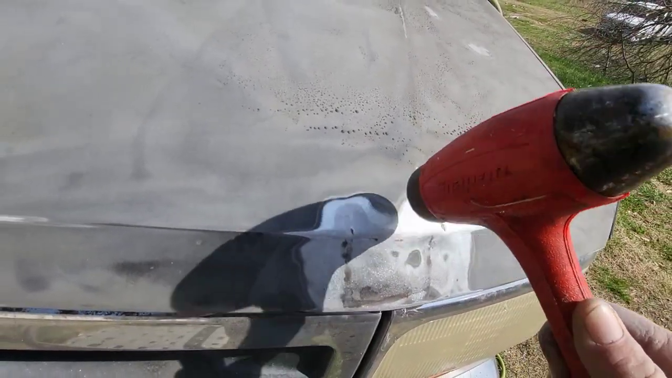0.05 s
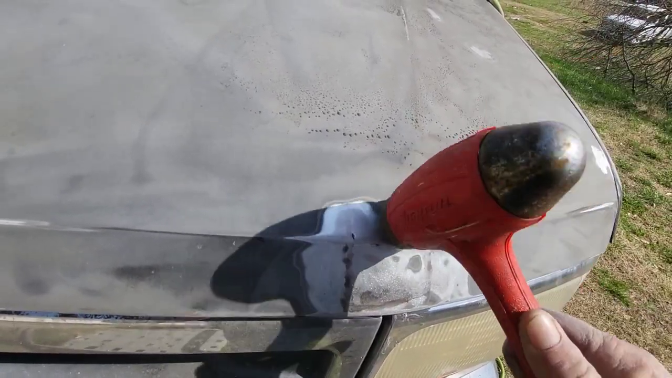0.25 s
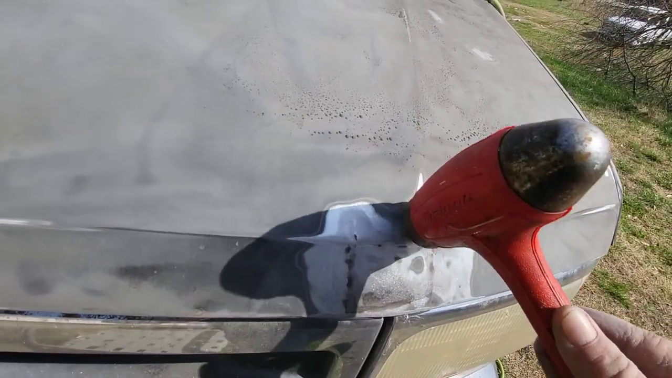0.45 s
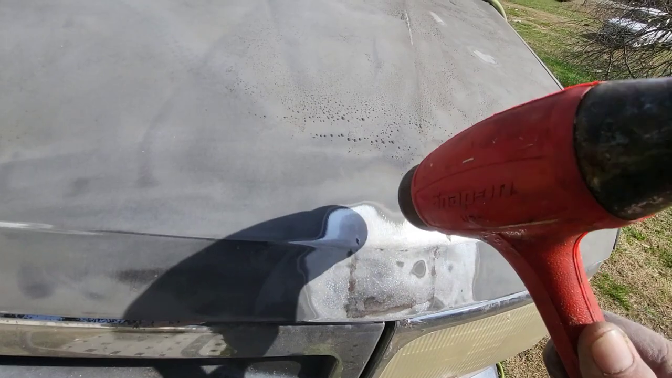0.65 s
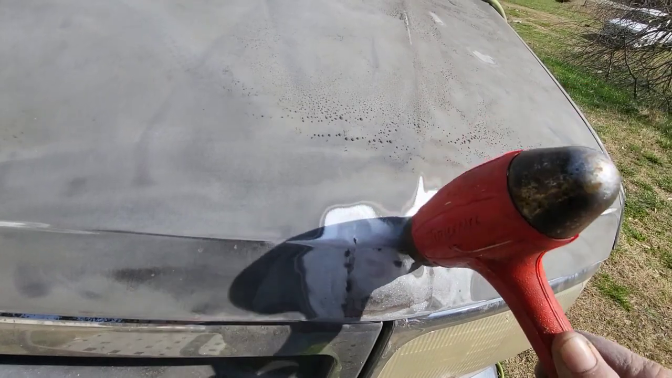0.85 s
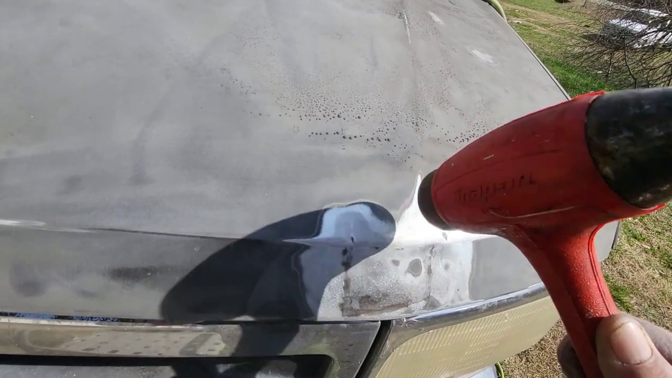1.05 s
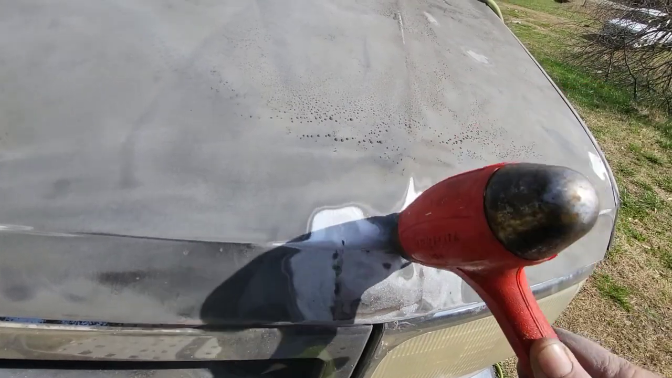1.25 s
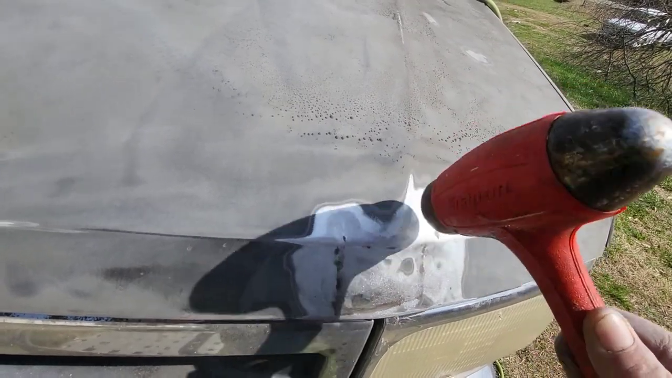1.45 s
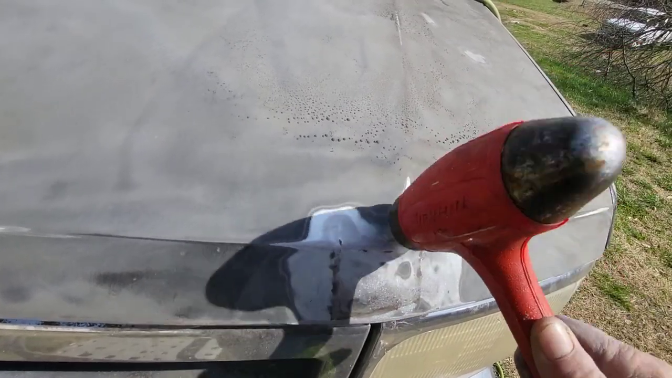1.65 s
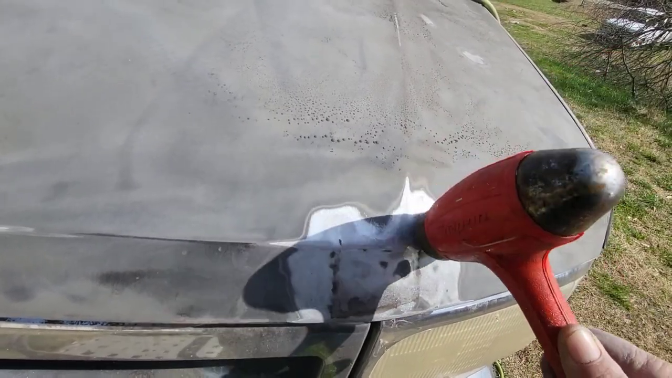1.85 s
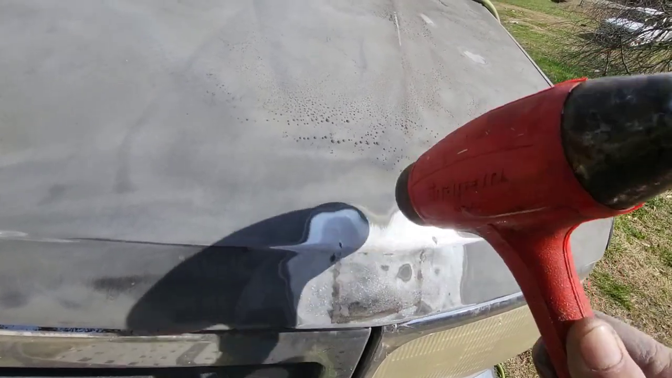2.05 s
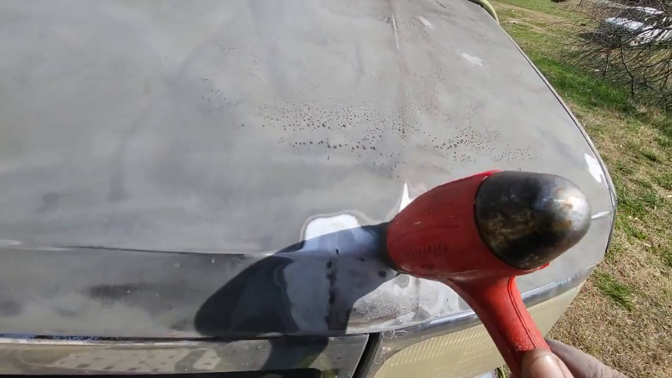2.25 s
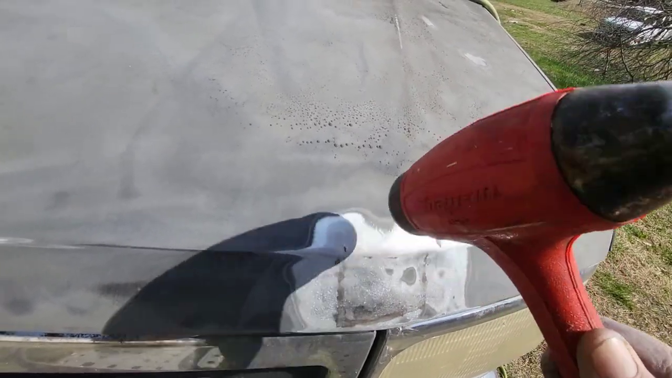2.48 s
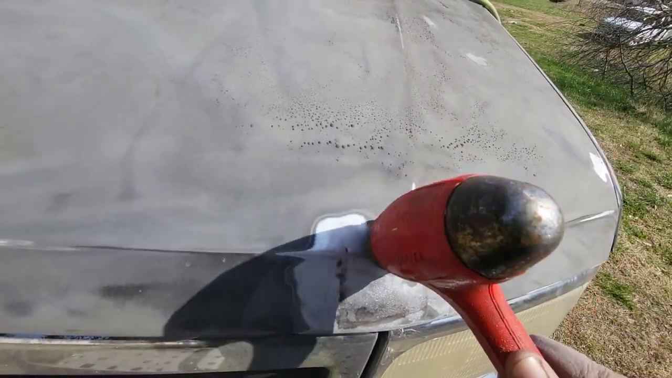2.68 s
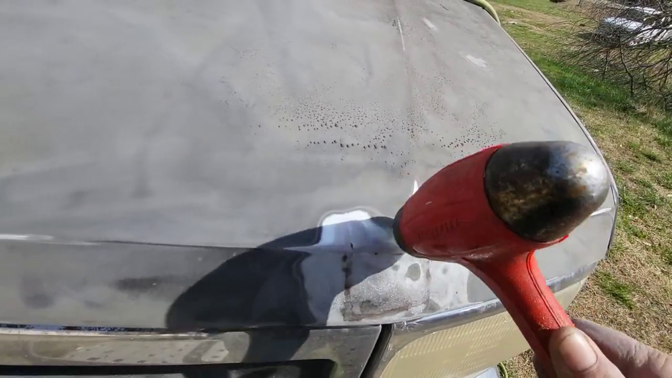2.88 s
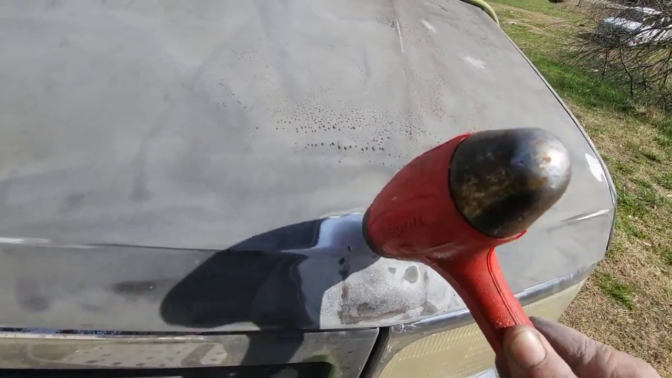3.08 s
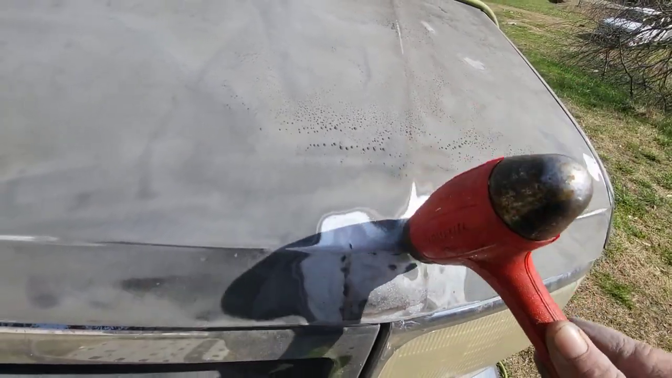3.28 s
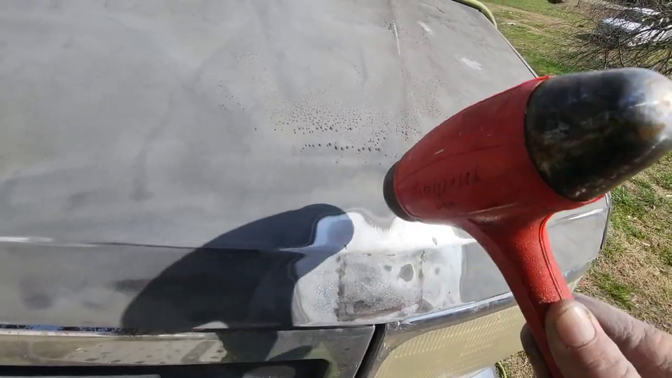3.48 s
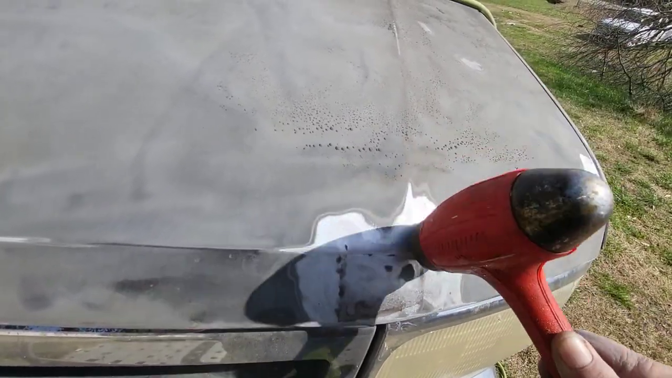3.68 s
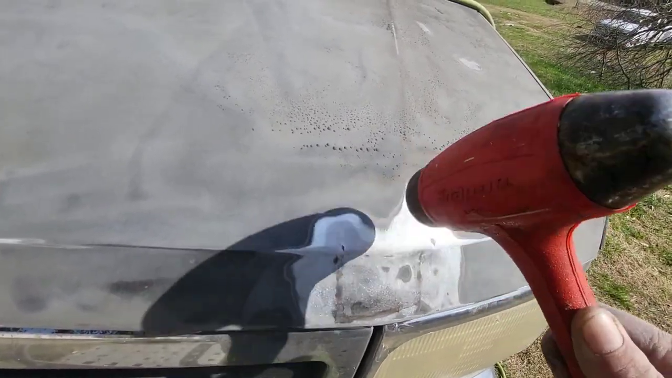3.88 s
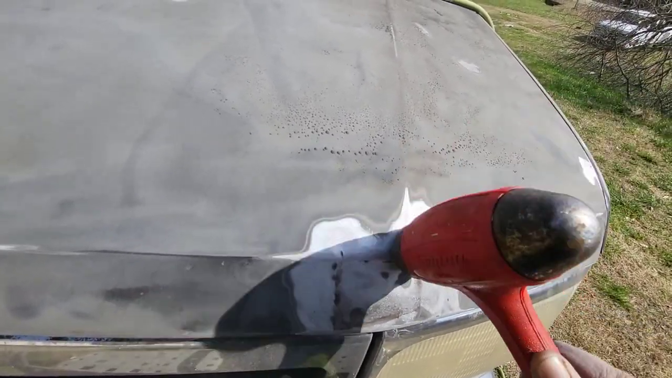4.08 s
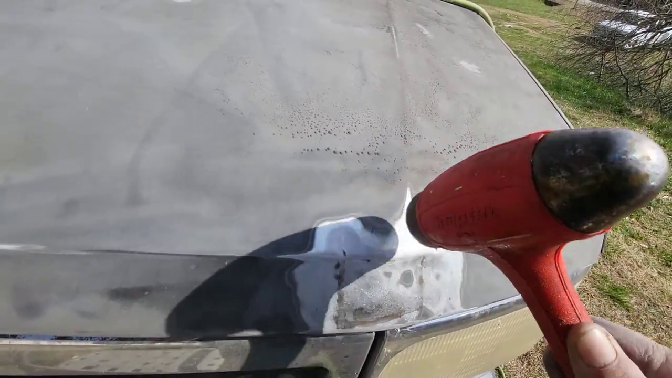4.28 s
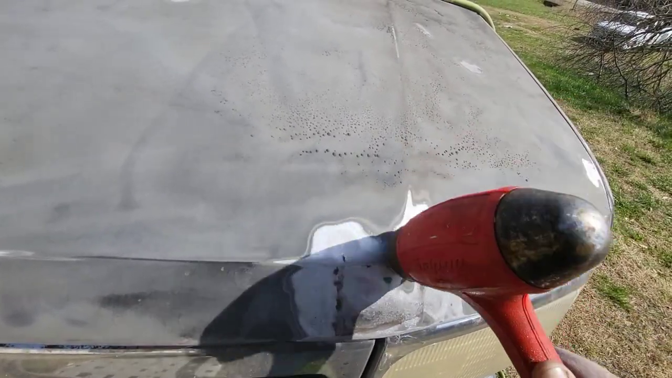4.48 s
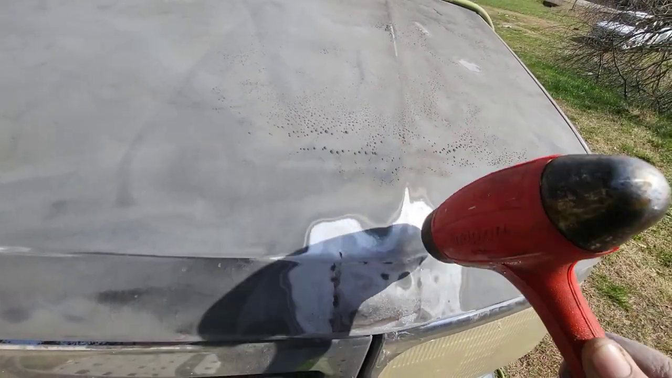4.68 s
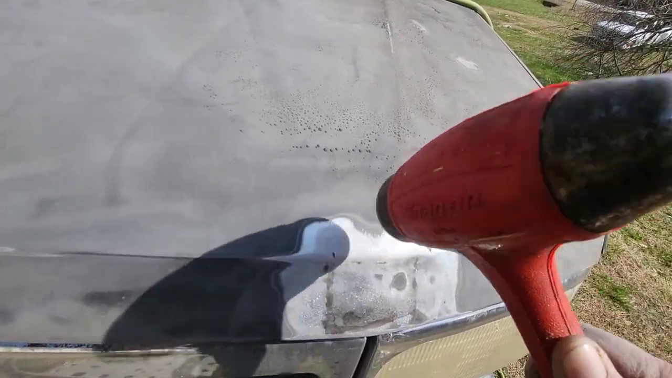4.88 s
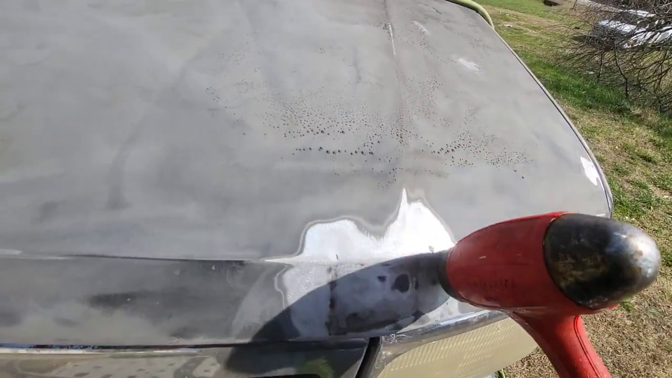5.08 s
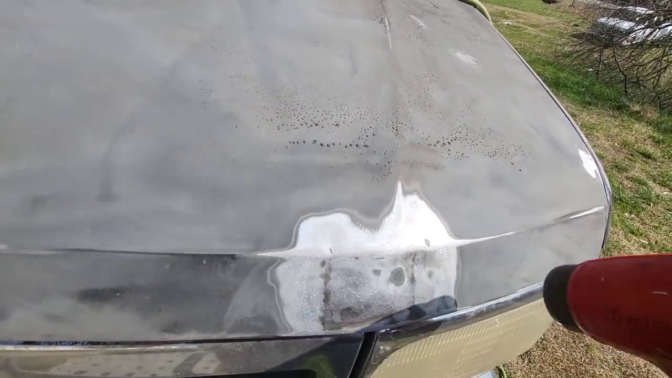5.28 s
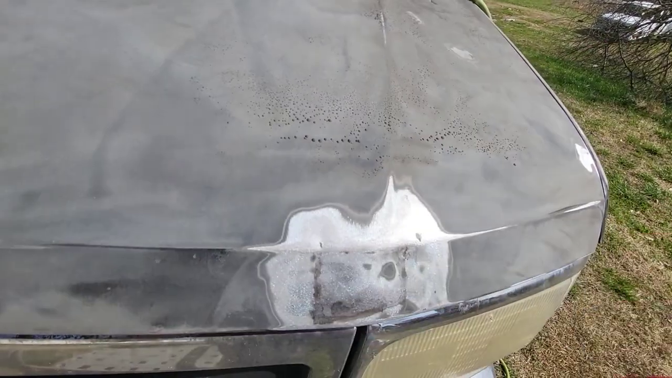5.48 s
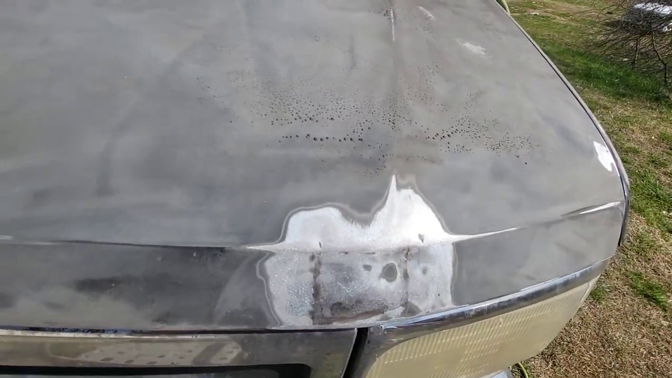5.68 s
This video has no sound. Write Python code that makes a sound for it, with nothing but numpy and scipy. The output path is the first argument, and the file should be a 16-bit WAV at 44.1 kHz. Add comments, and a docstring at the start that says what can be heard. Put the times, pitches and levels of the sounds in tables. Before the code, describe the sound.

A mallet strikes the thin metal hood of a truck at an even pace, roughly two blows a second. Each hit gives a sharp click, a hollow low thump and a brief tinny wash, with quick lighter rebounds right after. Close stereo microphone, outdoors and dry, with faint far traffic rumble and hiss behind. A distant car passes softly in the second half.

```python
"""The sheet-metal hood of a truck: a mallet taps it about twice a second, outdoors, close to a stereo microphone.
Each blow rebounds two to four times; every contact clicks and thumps the panel's ringing modes,
and leaves a short metallic wash of filtered noise.
Behind it, bands of wavering noise make far rumble, hiss and faint whines, and a distant car passes.
A look-ahead limiter holds the peaks."""
import sys
import numpy as np
from scipy import signal
from scipy.io import wavfile
from scipy.ndimage import uniform_filter1d, minimum_filter1d

SR = 44100
rng = np.random.default_rng(int(sys.argv[2]) if len(sys.argv) > 2 else 0)


def wav_record(signal):
    """Record a signal, one row per channel, as 16-bit PCM in the file named by sys.argv[1]."""
    frames = np.transpose(np.atleast_2d(signal))
    bounded = np.clip(frames, -1, 1)
    # unit amplitude maps onto the largest positive 16-bit level
    quanta = np.round(bounded * 32767).astype(np.int16)
    wavfile.write(sys.argv[1], SR, quanta)


N = 252693
LEAD = 4000   # samples of run-in, so a blow just before the start still rings
TOTAL = N + LEAD
THIRD_OCTAVE_EDGES_HZ = 26.6 * 2 ** np.arange(0, 9.7, 1 / 3)
RIGHT_LAG_S = 0.00017


def from_db(db):
    """Decibels to gain."""
    return 10 ** (np.asarray(db) / 20)


def at_hz(points, hz):
    """A table read on a log-frequency axis."""
    table_hz, value = np.array(points).T
    return np.interp(np.log(hz), np.log(table_hz), value)


def over_time(points):
    """A table of levels read at every sample, run-in included."""
    t = (np.arange(TOTAL) - LEAD) / SR
    return np.interp(t, *np.transpose(points))


def leaning(lean_db):
    """Left and right gains whose difference is the lean, left minus right."""
    return from_db([[lean_db / 2], [-lean_db / 2]])


def drift(rate_hz):
    """Slow chance with spread 1: noise low-passed at the rate, one value every 40 samples, joined by lines."""
    r = np.exp(-2 * np.pi * rate_hz * 40 / SR)
    noise = rng.standard_normal(TOTAL // 40 + 2002)
    slow = signal.lfilter([1], [1, -2 * r, r * r], noise)[2000:]   # drop the filter's settling
    return np.interp(np.arange(TOTAL) / 40, np.arange(len(slow)), slow / slow.std())


def bands(low_hz, high_hz):
    """Third-octave band-passes with their centres."""
    chosen = []
    for low, high in zip(THIRD_OCTAVE_EDGES_HZ, THIRD_OCTAVE_EDGES_HZ[1:]):
        if low >= low_hz and high <= high_hz:
            chosen.append((np.sqrt(low * high), signal.butter(2, [low, high], "band", fs=SR, output="sos")))
    return chosen


def pair(mid, side, alike, lean_db):
    """Left and right from two unrelated noises, shared in part (likeness 1: same, -1: opposite)."""
    alike = np.clip(alike, -1, 1)
    stereo = np.sqrt(1 + alike) * mid + np.sqrt(1 - alike) * side * [[1], [-1]]
    return leaning(lean_db) * stereo


def lagged(left, right):
    """The right port is a little farther from the hood, so sound reaches it later."""
    n = np.arange(len(right))
    return np.array([left, np.interp(n - RIGHT_LAG_S * SR, n, right)])


def ring(clicks, hz, t60):
    """A damped resonance: a unit click sets a sine of height 1 ringing."""
    r, w = from_db(-60 / (t60 * SR)), 2 * np.pi * hz / SR
    return signal.lfilter([0, np.sin(w)], [1, -2 * r * np.cos(w), r * r], clicks)


def dying(clicks, t60):
    """An exponential fall after each click."""
    return signal.lfilter([1], [1, -from_db(-60 / (t60 * SR))], clicks)


# mallet blows on the hood, the struck spot wandering: (time [s], strength [dB], treble of the blow [dB],
# treble of its rebounds [dB], tilt of the boom [dB per octave], midrange wash [dB])
MALLET_BLOWS = [(-0.0565, 0, -6, 8, 0, 0), (0.4632, 1, 16, 5.5, -2, 0.5), (0.9354, 3.5, 6.5, 7, 0.6, 2.5),
                (1.4076, 4, 14.5, 2, 0, 2.8), (1.877, 2.5, 12, 5.5, 0.3, -0.5),
                (2.3562, 3.5, 13, 2, 0.6, 1), (2.8396, 6.5, 7, 0, 0.9, 2.3), (3.3158, 4, 16, 3.5, -0.3, 0),
                (3.7714, 5.5, 6.5, 3, 1.7, 3.7), (4.2299, 2.5, 8, -5.5, 1.4, 3),
                (4.6773, 4.5, 0, -3, 3.1, 2.5), (5.1477, 3.5, 7, -3.5, 1.1, 5.5)]
# the head bounces back onto the sheet: (time [s], push [dB], crack [dB])
HEAD_BOUNCES = [(0.0032, 1.2, -4), (0.0332, -13.5, -18.5), (0.5237, 1.2, -3.5), (0.556, -9, -16),
                (0.595, -40, -34), (0.613, -40, -36), (0.994, -0.8, -5.5), (1.024, -22, -24),
                (1.054, -15.5, -30.5), (1.4638, 0.9, -3), (1.518, -14, -22.5), (1.9281, 0.1, -5),
                (1.96, -15, -15), (2.407, -4.5, -4), (2.438, -10, -9.5), (2.46, -23, -30),
                (2.8924, -6, -3.5), (2.9228, -10, -14.5), (2.947, -17, -29), (2.975, -12, -28.5),
                (3.367, -5.5, -4), (3.3972, -6.5, -11.5), (3.8224, -7.5, -5), (3.8564, -6, -11.5),
                (4.2779, -5, -7), (4.3081, -5.5, -11), (4.7289, -5.5, -4), (4.7627, -7.5, -9.5),
                (5.2013, -19, -3), (5.232, -8.5, -10), (5.2551, -15, -18.5), (5.2748, -20.5, -19)]
BLOW_CRACK_DB, BLOW_RING_DB = -5.5, -4   # against the blow's strength
CRACK_DB_PER_TREBLE_DB = -0.61   # a brighter blow has less body
REBOUND_RING_DB = -6.5   # against the rebound's crack


def contacts():
    """Blows and rebounds in time order: (time [s], push [dB], crack [dB], treble [dB], ringing [dB])."""
    blow_s, _, _, rebound_treble_db = np.transpose(MALLET_BLOWS)[:4]
    rows = []
    for s, strength_db, treble_db, *_ in MALLET_BLOWS:
        crack_db = strength_db + BLOW_CRACK_DB + CRACK_DB_PER_TREBLE_DB * treble_db
        rows.append((s, strength_db, crack_db, treble_db, strength_db + BLOW_RING_DB))
    for s, push_db, crack_db in HEAD_BOUNCES:
        treble_db = rebound_treble_db[np.searchsorted(blow_s, s) - 1]   # set by the blow before it
        rows.append((s, push_db, crack_db, treble_db, crack_db + REBOUND_RING_DB))
    return np.array(sorted(rows))


def rebounds():
    """True for a contact that follows another within 0.2 s."""
    return np.diff(contacts()[:, 0], prepend=-1) < .2


def spot():
    """Tilt and midrange of each contact: rebounds land where their blow did."""
    blow_index = np.cumsum(~rebounds()) - 1
    return np.array(MALLET_BLOWS)[blow_index, 4:].T


def impulses(db, delay_s=0):
    """One impulse per contact, over a floor that is never quite zero."""
    out = np.full(TOTAL, 1e-18)
    at = np.round((contacts()[:, 0] + delay_s) * SR).astype(int) + LEAD
    out[at] = from_db(db)
    return out


# click of a blow, before its offset: (frequency [Hz], relative density [dB per Hz])
BLOW_CLICK = [(470, -29), (800, -5), (1260, -11.5), (3750, -25), (5210, -54), (5840, -55), (6890, -60),
              (7620, -18), (8430, -27), (9570, -65), (11000, -27), (13300, -25), (15300, -43), (16500, -36)]
# click of a rebound, before its offset: (frequency [Hz], relative density [dB per Hz])
REBOUND_CLICK = [(470, -30), (800, -1), (1670, -8), (3660, -12.5), (5840, -36), (7340, -18), (8220, -27),
                 (9450, -80), (11000, -41), (13100, -34.5), (14400, -50), (15700, -70), (16500, -45)]
# noise of the sheet's dense high modes, before its offset: (frequency [Hz], relative density [dB per Hz])
SHEET_WASH = [(120, -31), (200, -19), (300, -2.5), (617, -21.5), (892, -17.5), (1130, -32), (1730, -19),
              (2050, -26.5), (3700, -27), (4970, -30.5), (9840, -49.5), (15300, -39.5), (16500, -76)]
# how long the wash lasts: (frequency [Hz], t60 [s])
SHEET_WASH_T60 = [(400, 0.36), (700, 0.2), (2000, 0.14), (5000, 0.094), (12000, 0.05)]
# stereo balance of the hood: (frequency [Hz], left minus right [dB])
HOOD_LEAN = [(60, 1.5), (110, 2.5), (200, 2.0), (380, 1.0), (700, 2.0), (1290, 5.0), (2380, 7.5),
             (4400, -1.0), (8120, 8.0), (15000, 4.0)]
# stereo likeness of the wash: (frequency [Hz], left-right likeness [-1 to 1])
WASH_ALIKE = [(300, 0.45), (700, 0.38), (1400, -0.78), (3000, 0.48), (8000, -0.42)]
CRACK_DB, REBOUND_CRACK_DB, WASH_DB = 23, 22, 11   # offsets of the three spectra
REBOUND_TREBLE_DB = 4.5   # extra treble in a rebound's wash
MIDRANGE_HZ = 860


def crack_and_wash(burst_db=-4.5, rebound_burst_db=4.0, burst_share=0.64, chatter_db=3.5, spread_s=0.041):
    """A sharp click at each contact, then countless high plate modes as noise: a quick burst, a slower tail."""
    _, _, crack_db, treble_db, ring_db = contacts().T
    tilt, midrange_db = spot()
    bounce = rebounds()
    quick_db = np.where(bounce, rebound_burst_db, burst_db)   # a light bounce puts more into fast-dying modes
    chatter = from_db(chatter_db * drift(186.0))              # loose seams buzz unevenly
    white = rng.standard_normal((2, 2, TOTAL)) * chatter
    out = 0
    for k, (hz, band) in enumerate(bands(400, 18000)):
        lean_db, t60 = at_hz(HOOD_LEAN, hz), at_hz(SHEET_WASH_T60, hz)
        high = np.clip(np.log2(hz / 4500), 0, 1)   # treble settings fade in over this octave
        middle = max(1 - abs(np.log2(hz / MIDRANGE_HZ)), 0)

        blow_colour_db = CRACK_DB + at_hz(BLOW_CLICK, hz)
        rebound_colour_db = REBOUND_CRACK_DB + at_hz(REBOUND_CLICK, hz)
        colour_db = np.where(bounce, rebound_colour_db, blow_colour_db)
        clicks = impulses(crack_db + colour_db + treble_db * high)
        crack = (hz > 800) * lagged(clicks, clicks) * leaning(lean_db)

        start_db = ring_db + WASH_DB + at_hz(SHEET_WASH, hz) + midrange_db * middle
        start_db = start_db + (treble_db + REBOUND_TREBLE_DB * bounce) * high
        slow = impulses(start_db)
        tail = dying(slow, t60) - dying(slow, spread_s)   # builds up as waves spread over the sheet
        burst = dying(impulses(start_db + quick_db), t60 * burst_share)
        wash = pair(*(white[k % 2] * (tail + burst)), at_hz(WASH_ALIKE, hz), lean_db)

        # alternate signs join the bands without holes
        out = out + signal.sosfilt(band, wash + (-1) ** k * crack)
    return out


# bright modes near the struck spot, rung by the hard crack:
# (frequency [Hz], relative level [dB], t60 before the cap [s])
BRIGHT_MODES = [(1080, -19, 0.33), (1252, -12, 0.13), (1323, -14.5, 0.19), (1412, -7, 0.099),
                (1465, -18, 0.18), (1683, -0.5, 0.082), (1745, -5.5, 0.14), (1808, -5.5, 0.13),
                (1860, -26.5, 0.17), (2128, -25.5, 0.024), (2286, -9, 0.061), (2437, -7.5, 0.07),
                (2570, -5.5, 0.1), (3100, -16, 0.05), (3520, -8, 0.06)]
SPOT_DB, SPOT_REBOUND_DB = -20.5, 9   # all contacts; added on rebounds
SPOT_T60_MAX_S = .2   # the bright modes die within 0.2 s


def clink(spread_db=4.5):
    """Bright modes ring, each by chance louder or softer; the ports hear them with other polarities."""
    out = np.zeros((2, TOTAL))
    ring_db = contacts()[:, 4] + SPOT_DB + SPOT_REBOUND_DB * rebounds()
    chance_db = rng.normal(0, spread_db, (len(contacts()), len(BRIGHT_MODES)))
    for k, (hz, level_db, t60) in enumerate(BRIGHT_MODES):
        clicks = impulses(ring_db + level_db + chance_db[:, k])
        tone = (-1) ** k * ring(clicks, hz, min(t60, SPOT_T60_MAX_S))
        right_polarity = (-1) ** (k // 2)
        out += tone * leaning(at_hz(HOOD_LEAN, hz)) * [[1], [right_polarity]]
    return lagged(*out)


TICK_DELAY_S, TICK_HZ, FACE_CUT_HZ = .0002, 2600, 4500
TICK_DB, REBOUND_TICK_DB = -6.5, -3   # against the crack
TICK_LEAN_DB = 6   # left minus right


def tick():
    """The face of the mallet lands: one short pulse of suction, softened by a low-pass."""
    tick_db = contacts()[:, 2] + np.where(rebounds(), REBOUND_TICK_DB, TICK_DB)
    clicks = impulses(tick_db, TICK_DELAY_S)
    r = np.exp(-2 * np.pi * TICK_HZ / SR)
    # the factor in front brings the peak near the click's height
    pulse = -np.e * (1 - r) * signal.lfilter([1], [1, -2 * r, r * r], clicks)
    pulse = signal.sosfilt(signal.butter(2, FACE_CUT_HZ, fs=SR, output="sos"), pulse)
    return lagged(*(pulse * leaning(TICK_LEAN_DB)))


# low modes of the hood: (frequency [Hz], relative level [dB], t60 [s], polarity at the struck spot [+1 or -1])
LOW_MODES = [(40.7, -24.5, 0.46, -1), (49.5, -15.5, 0.3, -1), (59, -52, 0.06, -1), (80.8, -12.5, 0.28, 1),
             (97.3, -8.5, 0.14, 1), (130.3, -19, 0.46, -1), (149.7, -15.5, 0.19, 1),
             (186.8, -20.5, 0.51, 1), (200.24, -20, 0.49, 1), (221.76, -9.5, 0.24, 1),
             (238.3, -21, 0.47, 1), (255.05, -11, 0.28, -1), (286.3, -18, 0.36, -1), (305.5, -26, 0.51, 1),
             (308, -45, 0.65, 1), (341.9, -12.5, 0.28, -1), (370.4, -20, 0.33, -1), (415.8, -20, 0.37, -1),
             (483.5, -27.5, 0.29, 1), (522, -49.5, 0.84, 1), (576.8, -29, 0.26, 1), (715, -37, 0.11, -1),
             (789.5, -28.5, 0.15, 1), (847, -44, 0.51, 1)]
PUSH_DELAY_S = .00087
TILT_PIVOT_HZ = 205
REBOUND_TILT = 0.76   # dB per octave: rebounds ring the low modes slightly less, the higher ones slightly more
DENT_HZ, DENT_DB, DENT_T60_S = 463, -14, 0.0076
THUMP_LEAN_DB = 2.5   # modes, left minus right; the dent leans twice as far


def thump():
    """The panel yields a moment after contact; the same modes ring every time, tilted by the spot."""
    push_db = contacts()[:, 1]
    tilt = spot()[0] + REBOUND_TILT * rebounds()
    out = np.zeros((2, TOTAL))
    for hz, level_db, t60, polarity in LOW_MODES:
        octaves = np.clip(np.log2(hz / TILT_PIVOT_HZ), -1, 1)
        push = impulses(push_db + tilt * octaves, PUSH_DELAY_S)
        out += np.sign(polarity) * ring(push, hz, t60) * from_db(level_db) * leaning(THUMP_LEAN_DB)
    dent = ring(impulses(push_db + DENT_DB), DENT_HZ, DENT_T60_S)
    out = out - dent * leaning(2 * THUMP_LEAN_DB)   # the skin first moves away
    return lagged(*out)


# stereo balance of the background: (frequency [Hz], left minus right [dB])
BACKGROUND_LEAN = [(60, 3.5), (110, -1.5), (200, 0.5), (380, -0.5), (700, 4.5), (1290, 2), (2380, 8.5),
                   (4400, -6), (8120, 11.5), (15000, -5)]
# stereo likeness of the background: (frequency [Hz], left-right likeness [-1 to 1])
BACKGROUND_ALIKE = [(60, 1), (130, 0.87), (290, 0.98), (640, -0.069), (1410, -0.57), (3100, 0.21),
                    (6820, -0.26), (15000, 0.16)]


def traffic(spectrum, level_db, low_hz, high_hz, patchy_db):
    """Bands of stereo noise, each wavering on its own and a little together; level is that of the mono mix."""
    white = rng.standard_normal((2, 2, TOTAL))
    together = drift(4.2)
    out = 0
    for k, (hz, band) in enumerate(bands(low_hz, high_hz)):
        mid, side = signal.sosfilt(band, white[k % 2])
        waver_db = patchy_db * (.5 * together + drift(8.5))
        gain = from_db(at_hz(spectrum, hz) + waver_db)
        out = out + gain * pair(mid, side, at_hz(BACKGROUND_ALIKE, hz), at_hz(BACKGROUND_LEAN, hz))
    return from_db(level_db) * out / out.mean(0).std()


# far traffic rumble: (time [s], level [dB])
RUMBLE_LEVEL = [(0.3, -37), (0.69, -32.5), (1.3, -38.5), (1.87, -34), (5.38, -37.5), (5.73, -40)]
# colour of the rumble: (frequency [Hz], relative density [dB per Hz])
RUMBLE_COLOUR = [(12, -43), (20, -41), (59, 1.5), (89, 3), (168, -13), (295, -10.5), (392, -25),
                 (490, -20.5), (700, -38), (910, -61), (1540, -120)]


def rumble():
    """Far traffic's low end: patchy bands of noise that swell and sink."""
    return traffic(RUMBLE_COLOUR, over_time(RUMBLE_LEVEL), 20, 640, patchy_db=2.5)


# far traffic hiss: (time [s], level [dB])
FAR_HISS_LEVEL = [(0, -54), (1.8, -55), (3.2, -54.5), (5.0, -55.5), (5.73, -56.5)]
# colour of the hiss: (frequency [Hz], relative density [dB per Hz])
HISS_COLOUR = [(290, -30), (500, 0), (538, -7), (787, -3), (872, 3.5), (1170, -11.5), (1370, 9),
               (1640, -5.5), (3660, -9), (3990, -11), (4760, -11.5), (9060, -30.5), (10000, -33),
               (15100, -16.5), (16500, -87)]


def hiss():
    """Far traffic's upper end: nearly steady bands of noise."""
    return traffic(HISS_COLOUR, over_time(FAR_HISS_LEVEL), 500, 18000, patchy_db=0.44)


# narrow bands in the background: (frequency [Hz], width of one resonance [Hz], relative level [dB])
NARROW_BANDS = [(1133, 55, -60.5), (2470, 34, -72), (4905, 100, -71), (6370, 170, -76.5), (10080, 600, -76)]


def whines():
    """Faint wavering bands of noise, each through a resonance twice."""
    out = 0
    for hz, width_hz, level_db in NARROW_BANDS:
        tone = rng.standard_normal((2, TOTAL))
        t60 = np.log(1000) / (np.pi * width_hz)
        for _ in range(2):
            tone = ring(tone, hz, t60)
        gain = from_db(level_db + 0.62 * drift(3.9)) / tone.std()
        out = out + gain * pair(*tone, at_hz(BACKGROUND_ALIKE, hz), at_hz(BACKGROUND_LEAN, hz))
    return out


# tyre noise of a car passing far off: (time [s], level [dB])
PASSING_LEVEL = [(0, -112), (2.6, -60), (3.4, -54), (4.1, -50.5), (4.7, -56), (5.2, -57), (5.73, -67)]
# colour of the tyre noise: (frequency [Hz], relative density [dB per Hz])
TYRE_COLOUR = [(350, -31), (600, 3.5), (1150, -1), (1230, -4), (1890, 3), (2430, -5.5), (3250, -33),
               (3830, -7), (5070, -9), (8000, -57), (10400, -64), (17600, -120)]


def passing_car():
    """Tyres far off: bands of noise that rise out of near silence and fall again."""
    return traffic(TYRE_COLOUR, over_time(PASSING_LEVEL), 500, 9000, patchy_db=0.5)


def scene():
    """The hood close by, the traffic far behind, with the run-in cut off."""
    hood = crack_and_wash() + clink() + tick() + from_db(-2.0) * thump()
    background = rumble() + hiss() + whines() + passing_car()
    return (hood + background)[:, LEAD:]


MIC_LOW_HZ, CUTOFF_HZ = 2.5, 17000
LIMIT_DB, RELEASE_DB_PER_S = -1, 220
LOOK_SAMPLES = 65   # window centred on each sample, so the gain falls before a peak


def record(dry):
    """The microphone drops the deepest bass; a look-ahead limiter links both channels; the top is cut."""
    dry = signal.sosfilt(signal.butter(2, MIC_LOW_HZ, "high", fs=SR, output="sos"), dry)
    peak_db = 20 * np.log10(np.abs(dry).max(0) + 1e-9)
    over_db = np.maximum(peak_db - LIMIT_DB, 0)
    ramp_db = RELEASE_DB_PER_S * np.arange(N) / SR
    held_db = np.maximum.accumulate(over_db + ramp_db) - ramp_db   # lets go at the release rate
    gain_db = minimum_filter1d(-held_db, size=LOOK_SAMPLES)
    gain_db = uniform_filter1d(gain_db, size=LOOK_SAMPLES)
    limited = dry * from_db(gain_db)
    out = signal.sosfilt(signal.cheby2(12, 60, CUTOFF_HZ, fs=SR, output="sos"), limited)
    return np.clip(out, -1, 1)


dry = scene()
out = record(dry)
wav_record(out)
```